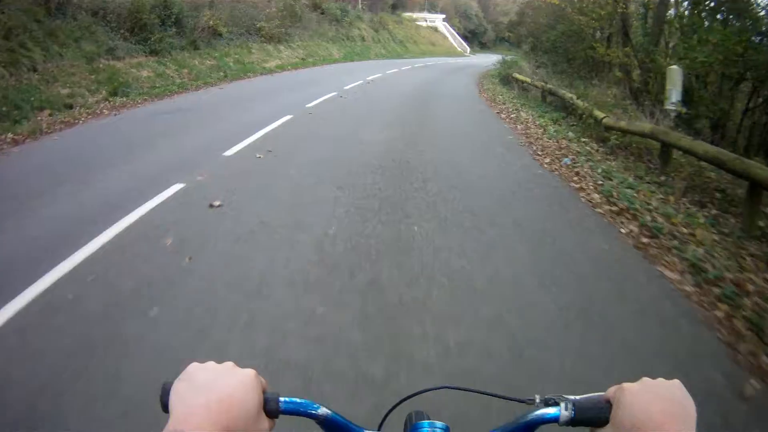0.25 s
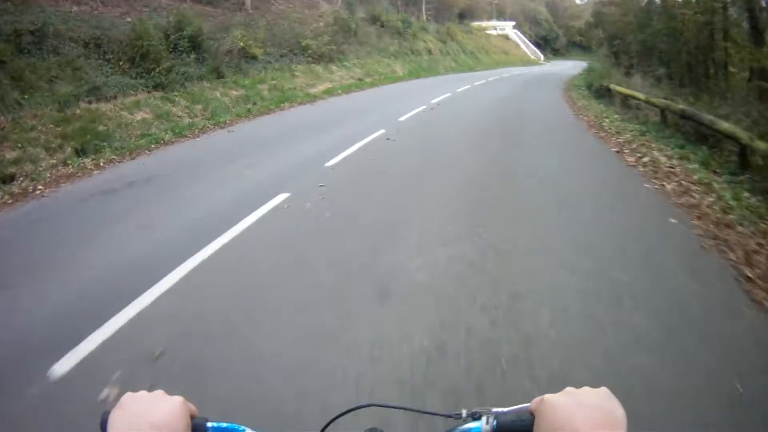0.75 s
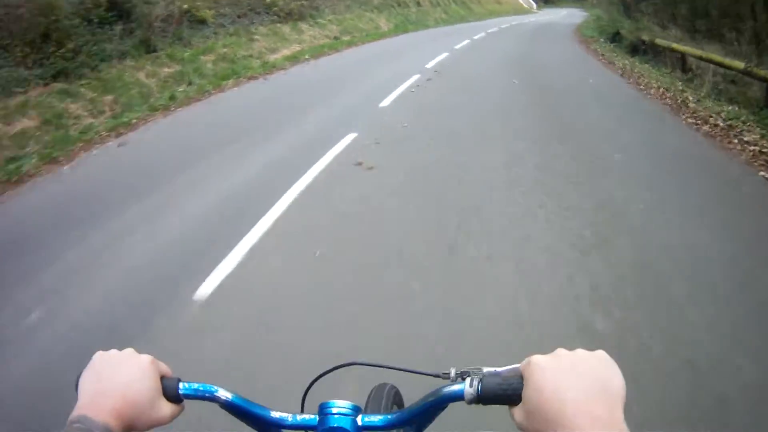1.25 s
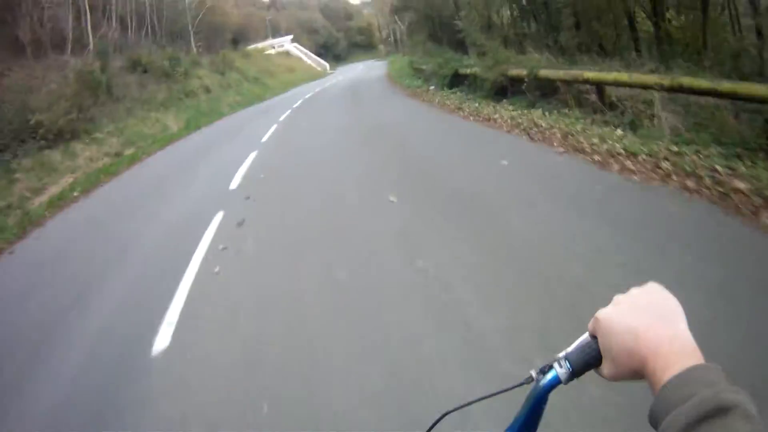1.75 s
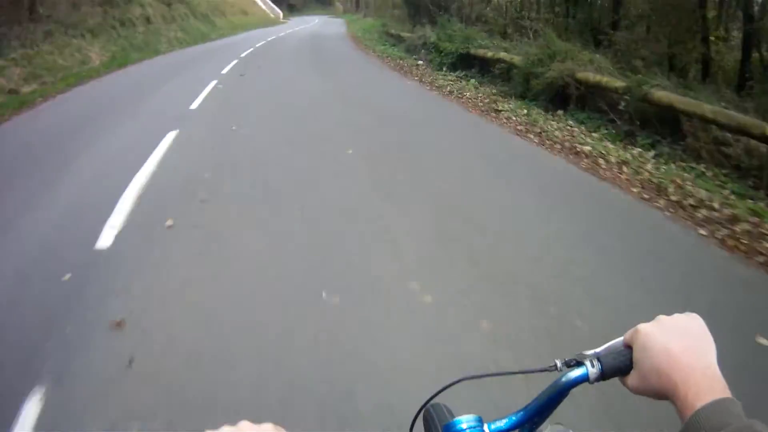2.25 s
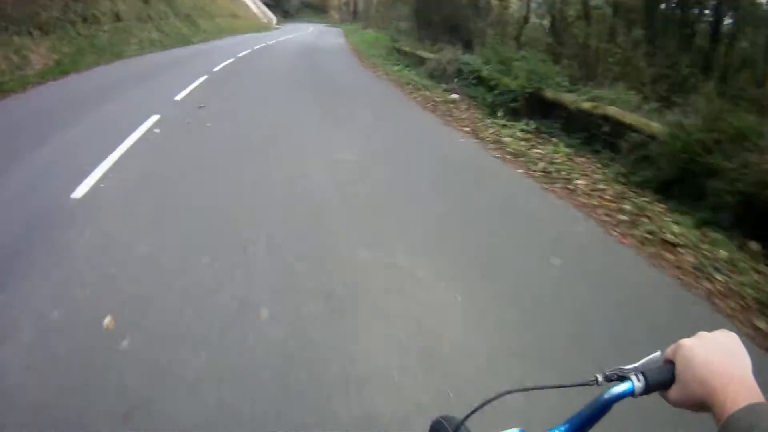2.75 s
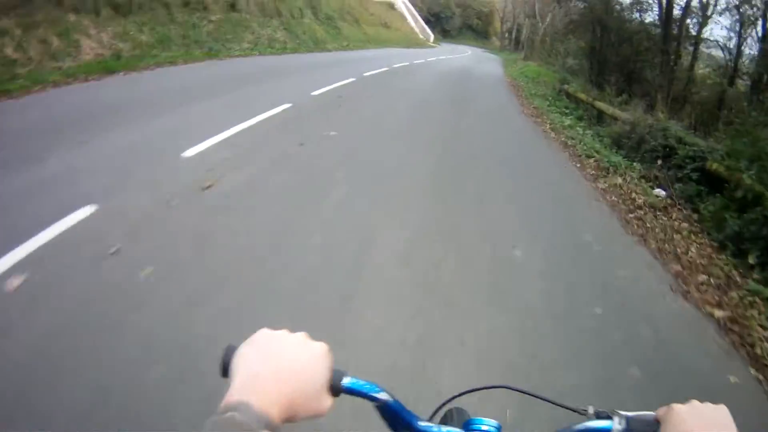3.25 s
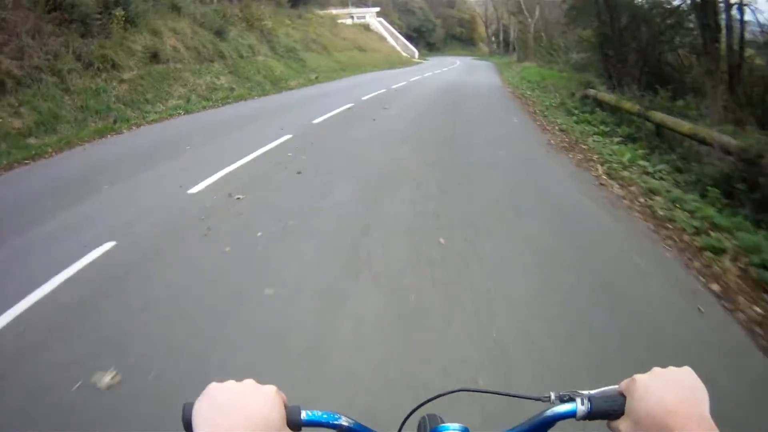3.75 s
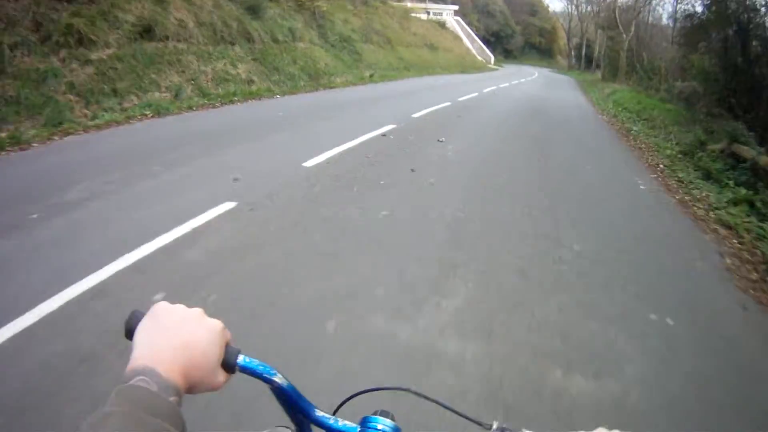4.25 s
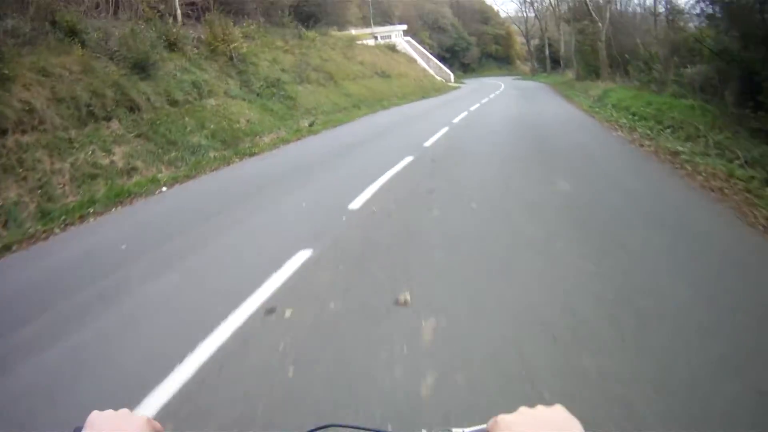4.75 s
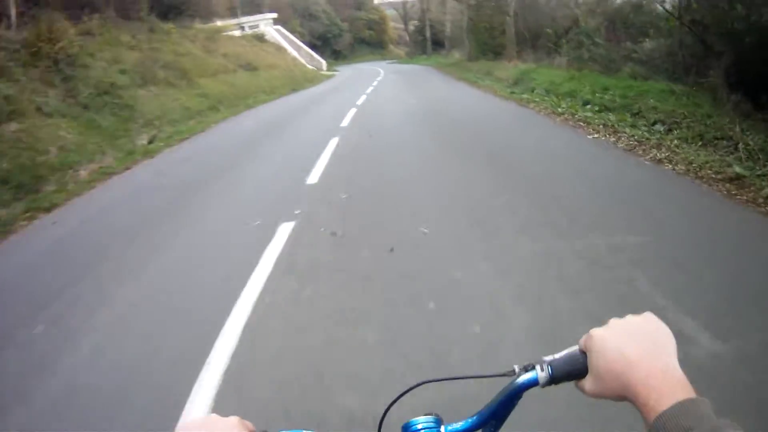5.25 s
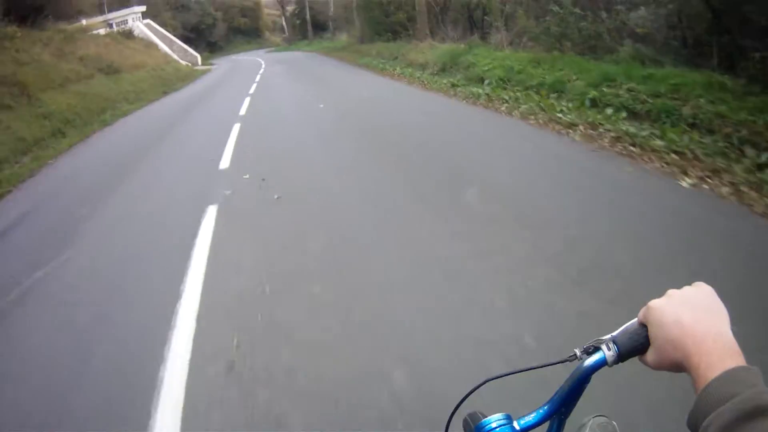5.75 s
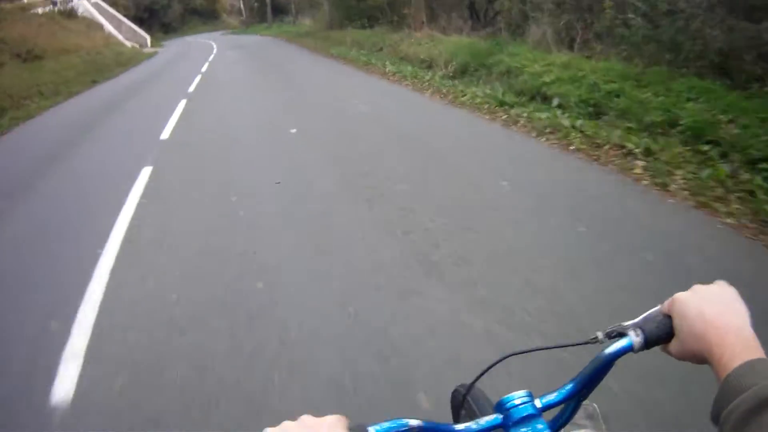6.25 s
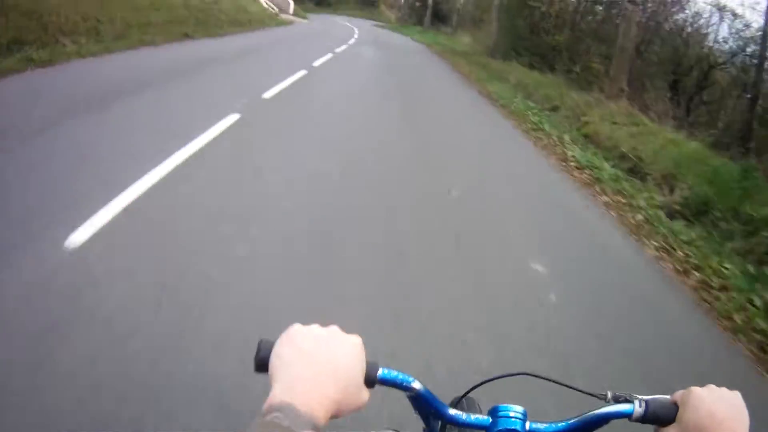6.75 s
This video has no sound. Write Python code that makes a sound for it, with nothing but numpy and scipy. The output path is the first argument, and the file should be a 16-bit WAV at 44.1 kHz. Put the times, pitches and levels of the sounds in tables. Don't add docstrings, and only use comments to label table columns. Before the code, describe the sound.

Continuous boxy rumbling hiss of wheels on coarse asphalt, with loose frame parts chattering, tiny metallic jingles, dull knocks and brief thin squeals.

```python
import sys
import numpy as np
from scipy import signal
from scipy.fft import rfft, irfft
from scipy.io import wavfile
from scipy.ndimage import uniform_filter1d, map_coordinates

SR = 44100
rng = np.random.default_rng(int(sys.argv[2]) if len(sys.argv) > 2 else 0)


def invert_db(level):
    return 10 ** (np.asarray(level, dtype=float) / 20)


def master_out(mix):
    frames = np.transpose(np.atleast_2d(mix))
    ceiling = np.clip(frames, -1, 1)
    pcm = np.round(ceiling * 32767).astype(np.int16)
    wavfile.write(sys.argv[1], SR, pcm)


N = 309141

# (time [s], load [dB])
ROAD_LOAD = [(0.0, -57.5), (0.15, -57), (0.8, -56.5), (1.31, -53.5), (1.68, -52), (2.24, -51.5),
             (2.93, -53), (3.28, -52.5), (3.61, -52), (3.86, -55.5), (4.0, -53), (4.31, -51), (4.84, -53.5),
             (5.09, -51), (5.41, -51.5), (6.19, -50.5), (6.33, -51), (7.01, -54.5)]
# (start [s], length [s], level [dB], pitch [Hz], roughness [0-1])
SLIDES = [(0.027, .07, -67.5, 2890, .6), (0.12, 0.12, -51, 2920, 0.56), (0.283, 0.1, -61, 2920, 0.8),
          (0.11, .13, -64, 3140, 0.6), (0.545, 0.11, -59, 3150, 0.7), (0.492, 0.089, -59, 2890, .5),
          (1.35, 0.16, -58, 2870, .6), (1.558, 0.047, -51, 2900, 0.3), (2.752, .025, -46.5, 2940, 0.5),
          (2.784, .05, -54, 2910, 0.4), (2.85, 0.079, -49.5, 2910, 0), (2.948, 0.027, -50, 2900, 0.3),
          (2.983, .05, -60, 3080, .7), (4.78, 0.13, -50, 2940, 0.44), (4.91, 0.14, -54.5, 2950, 1.1),
          (5.087, 0.07, -50, 2840, 0.3), (5.198, 0.04, -46.5, 2920, 0.2), (5.25, 0.1, -51.5, 2930, 0.5),
          (5.363, 0.081, -55.5, 2920, .9), (5.475, 0.14, -53.5, 2900, 0.74),
          (6.273, 0.047, -49.5, 2880, 0.6)]
# (pitch [Hz], width [Hz], level [dB])
CASE_MODES = [(1982, 160, -4.5), (2102, 190, 3.5), (2242, 206, 3), (3665, 490, -9.5), (1610, 1020, -19.5),
              (2865, 314, -4.5), (4550, 900, -10.5)]
# (pitch [Hz], width [Hz], level [dB])
HUB_MODES = [(937, 260, -3), (1147, 223, 2.5), (1254, 114, 4), (748, 480, -27)]
# (pitch [Hz], width [Hz], level [dB])
FRAME_MODES = [(4300, 110, -5), (4540, 260, -7), (4927, 215, -1.5), (5300, 430, -7), (5970, 140, -10.5),
               (6220, 160, -7.5), (6840, 1220, -11.5), (7290, 116, -8.5), (8490, 260, -14.5),
               (3550, 510, -6.5)]
# (pitch [Hz], width [Hz], level [dB])
JINGLE_MODES = [(9444, 160, -4), (9720, 410, -6.5), (11600, 140, -11), (14400, 750, -32), (15230, 230, -24)]
# (pitch [Hz], width [Hz], level [dB])
CHIME_MODES = [(10400, 170, -2), (10770, 500, -10), (11500, 590, -17), (11100, 100, -11), (12420, 520, -14),
               (12950, 710, -16.5), (14800, 900, -26), (15200, 420, -20.5)]

SLIDE_RISE_S, SLIDE_FALL_S = 0.02, 0.035
RING_RISE_S, RING_FALL_S = 0.037, 0.052


def unit(x):
    return x / np.sqrt(np.mean(x ** 2) + 1e-20)


def curves(rows):
    s, *cols = np.transpose(rows)
    return [np.interp(np.arange(N) / SR, s, c) for c in cols]


def wobble(rate):
    knots = rng.standard_normal(int(N * 400 / SR))
    return map_coordinates(knots, [np.arange(N) * rate / SR])


def coloured(x, gain):
    size = 2 ** 13
    cepstrum = irfft(np.log(gain(np.fft.rfftfreq(size, 1 / SR)) + 1e-6))
    cepstrum[1:size // 2] *= 2
    cepstrum[size // 2 + 1:] = 0
    response = irfft(np.exp(rfft(cepstrum)))
    return signal.fftconvolve(x, response)[:N]


def resonant(modes):
    def gain(f):
        power = sum(invert_db(2 * db) / (1 + (2 * (f - hz) / width) ** 2) ** 2 for hz, width, db in modes)
        return unit(np.sqrt(power))
    return gain


def sloped(points):
    hz, db = np.transpose(points)
    return lambda f: unit(invert_db(np.interp(np.log(f + 1), np.log(hz), db)))


def patchy(x, depth_db):
    z = signal.stft(x, nperseg=256)[2]
    field = uniform_filter1d(rng.standard_normal(z.shape), size=4, axis=0)
    field = uniform_filter1d(field, size=30, axis=1)
    return unit(signal.istft(z * invert_db(depth_db * unit(field)), nperseg=256)[1][:N])


def grit(spread_db, clump_db, clump_rate, patchy_db):
    sizes = invert_db(spread_db * wobble(300) + clump_db * wobble(clump_rate))
    return patchy(sizes * rng.standard_normal(N), patchy_db)


def swarms(times, peaks_db, rise, t60, first):
    starts = np.zeros(N)
    starts[np.round(times * SR).astype(int)] = invert_db(peaks_db)
    t = np.arange(SR // 10) / SR
    swarm = (1 - np.exp(-t / rise)) * invert_db(-60 * (t / t60) ** 1.15)
    envelope = np.abs(signal.fftconvolve(starts, swarm)[:N])
    return envelope * rng.standard_normal(N) + first * starts


def rings(times, peaks_db, pitches_hz, rise, t60):
    out, t = np.zeros(N + SR), np.arange(SR // 12) / SR
    for s, db, hz in zip(times, peaks_db, pitches_hz):
        drift = np.cumsum(0.088 * rng.standard_normal(len(t)))
        shape = (1 - np.exp(-t / rise)) * invert_db(db - 60 * t / t60)
        out[round(s * SR):][:len(t)] += shape * np.sin(2 * np.pi * hz * t + drift)
    return out[:N]


def trapezoid(t, start, length, rise, fall):
    return np.clip(np.minimum((t - start) / rise + .5, (start + length - t) / fall + .5), 0, 1)


def spells(starts, lengths, levels_db, rise, fall):
    t = np.arange(0, N + 32, 32) / SR
    power = sum(invert_db(2 * db) * trapezoid(t, s, length, rise, fall) ** 2
                for s, length, db in zip(starts, lengths, levels_db))
    return np.interp(np.arange(N) / SR, t, np.sqrt(power))


def driven(level_db, share, extra=0):
    mean_load_db = -52
    load_db, = curves(ROAD_LOAD)
    steady_db = level_db + share * (load_db - mean_load_db)
    return np.sqrt(invert_db(2 * steady_db) + extra ** 2)


def lifts():
    # (middle [s], length [s], depth [dB])
    dips = [(0.17, 0.029, 15), (0.486, 0.017, 11), (1.43, 0.026, 6), (2.89, 0.18, 2.5), (3.073, 0.037, 6),
            (3.19, 0.027, 8), (3.376, 0.036, 6), (3.99, 0.066, 6), (4.29, 0.047, 3), (4.49, 0.023, 8),
            (4.598, 0.027, 10), (5.273, 0.091, 4.5), (6.42, 0.075, 3), (6.632, 0.036, 5.5), (6.8, 0.02, 7),
            (6.883, 0.053, 2)]
    t = np.arange(0, N + 32, 32) / SR
    lost_db = sum(db * np.exp(-(2 * (t - s) / length) ** 2) for s, length, db in dips)
    return -np.interp(np.arange(N) / SR, t, lost_db)


def wheels():
    # (pitch [Hz], width [Hz], level [dB])
    axle_modes = [(1469, 164, 1), (1630, 93, -6.5)]
    # (pitch [Hz], width [Hz], level [dB])
    seat_modes = [(204, 97, 1), (274.4, 77, -1), (435, 120, -3), (616, 285, -3.5)]
    # (start [s], length [s], level [dB])
    axle_rings = [
        (0.28, 0.17, -71),
        (1.76, 0.43, -58.5),
        (4.65, 0.55, -59.5),
        (5.75, 0.41, -64),
        (1.14, 0.51, -69),
    ]
    shake = wobble(25)
    roll_db = curves(ROAD_LOAD)[0] + lifts()
    ringing = spells(*np.transpose(axle_rings), RING_RISE_S, RING_FALL_S)
    case = invert_db(roll_db + 2.0 + 0.35 * shake)
    case = case * grit(spread_db=1.5, clump_db=2.0, clump_rate=75, patchy_db=0.5)
    hub = driven(-59.5, 0.67) * invert_db(0.79 * shake)
    hub = hub * grit(spread_db=2.0, clump_db=0.54, clump_rate=40, patchy_db=0.5)
    axle = driven(-60.5, 0.7, ringing) * invert_db(0.65 * shake)
    axle = axle * grit(spread_db=1.5, clump_db=-0.24, clump_rate=55, patchy_db=0.5)
    seat = driven(-68.5, 0.28) * invert_db(0.21 * shake)
    seat = seat * grit(spread_db=2.5, clump_db=-0.5, clump_rate=18, patchy_db=1.0)
    shell = coloured(case, resonant(CASE_MODES)) + coloured(hub, resonant(HUB_MODES))
    return shell + coloured(axle, resonant(axle_modes)) + coloured(seat, resonant(seat_modes))


def chatter():
    # (start [s], length [s], chatter level [dB], jingle level [dB], chime level [dB])
    coarse_road = [(0.0, 0.095, -61, -61.5, -62), (0.176, 0.017, -51, -58, -56), (0.91, 0.3, -64, -72, -74),
                   (1.165, 0.035, -62, -63, -67), (1.274, 0.085, -58, -59, -57.5),
                   (1.418, 0.23, -55, -60.5, -55.5), (1.664, 0.33, -57.5, -66, -61.5),
                   (2.048, 0.16, -56, -60, -61), (2.22, 0.41, -57.5, -60.5, -57.5),
                   (2.61, 0.13, -57, -60, -58), (2.732, 0.11, -58.5, -66, -56.5),
                   (2.892, 0.15, -57.5, -59, -59), (3.093, 0.078, -56.5, -66, -71),
                   (3.212, 0.15, -57.5, -63, -70), (3.534, 0.11, -58, -58, -56),
                   (3.656, 0.08, -57.5, -56, -57), (3.885, 0.1, -65, -75, -72),
                   (4.018, 0.11, -58.5, -68, -64), (4.133, 0.1, -60, -63, -61),
                   (4.212, 0.041, -49.5, -53, -55), (4.344, 0.17, -66, -80, -75),
                   (4.485, 0.11, -57, -60, -58), (4.642, 0.21, -63.5, -71, -67),
                   (5.043, 0.23, -58, -58, -59), (5.283, 0.31, -55.5, -59.5, -56.5),
                   (5.625, 0.3, -59, -62, -58.5), (5.835, 0.18, -55.5, -63, -58),
                   (6.044, 0.2, -53.5, -56, -57), (6.254, 0.28, -58.5, -61, -61),
                   (6.45, 0.12, -51, -55.5, -52), (6.584, 0.05, -51.5, -60, -60),
                   (6.682, 0.053, -56, -63, -62)]
    start, length, *levels_db = np.transpose(coarse_road)
    clatter_spell, jingle_spell, chime_spell = [spells(start, length, db, rise=0.044, fall=0.019)
                                                for db in levels_db]
    pause = invert_db(0.27 * lifts())
    jolt = wobble(30)
    clatter = pause * driven(-62, 1, clatter_spell) * invert_db(1.2 * jolt)
    clatter = clatter * grit(spread_db=2.5, clump_db=1.5, clump_rate=87, patchy_db=0.66)
    jingle = pause * driven(-70, 0.72, jingle_spell) * invert_db(-6.0 + 1.6 * jolt)
    jingle = jingle * grit(spread_db=3.0, clump_db=2.0, clump_rate=70, patchy_db=2.0)
    chime = pause * driven(-70, 0.72, chime_spell) * invert_db(-8.0 + 1.5 * jolt)
    chime = chime * grit(spread_db=3.5, clump_db=2.5, clump_rate=85, patchy_db=0.5)
    high = coloured(jingle, resonant(JINGLE_MODES)) + coloured(chime, resonant(CHIME_MODES))
    return coloured(clatter, resonant(FRAME_MODES)) + high


def wind():
    # (start [s], length [s], level [dB])
    gust_spells = [
        (0.144, 0.14, -74),
        (2.05, 0.19, -81),
        (2.5, 0.17, -73),
        (4.63, 0.14, -70),
        (4.982, 0.13, -69),
    ]
    # (frequency [Hz], level [dB per Hz])
    pressure_slope = [(10, -20), (25, 5.5), (45, -12.5), (75, -15.5), (130, -14.5), (300, -29), (1000, -69)]
    steady = invert_db(-77.5 + 1.5 * wobble(4))
    press = np.hypot(steady, spells(*np.transpose(gust_spells), RING_RISE_S, RING_FALL_S))
    lumps = coloured(rng.standard_normal(N), sloped(pressure_slope))
    return press * invert_db(3.5 + 0.86 * wobble(11.0)) * lumps


def case_taps():
    # (time [s], peak [dB], hollow part [dB])
    tap_events = [(0.027, -30, -13), (0.365, -31, -18), (0.462, -31, -21), (0.525, -32, -18),
                  (0.51, -34, -16), (0.555, -34, -15), (0.657, -31.5, -15), (0.1867, -31, -10),
                  (0.925, -36, -3.5), (1.051, -28, -28), (1.3867, -49, -17), (2.3191, -40, -24),
                  (2.4742, -30, -14), (2.76, -29, -21), (3.022, -32, -11), (3.5498, -29, -15),
                  (4.0392, -30, -17), (4.3405, -33, -17), (4.423, -32, -17), (4.461, -29, -19),
                  (4.7208, -29, -13), (4.9262, -29, -17), (5.1332, -30, -14), (5.196, -27, -18),
                  (5.2315, -29, -13), (5.6464, -48, -15), (5.7506, -39, -15), (6.0135, -40, -17),
                  (6.3235, -38, -23), (6.647, -40, -25), (6.6628, -34, -28), (6.8214, -34, -23),
                  (2.248, -27, -21), (2.358, -27, -13), (2.5147, -25, -16), (2.5905, -24, -19),
                  (2.6384, -24.5, -18), (3.096, -32, -19), (3.1303, -25, -16), (3.182, -28.5, -23),
                  (3.2173, -27, -21), (3.241, -43, -17), (3.3015, -26, -11), (3.3373, -26.5, -16),
                  (3.634, -26, -23), (3.7564, -32, -26), (4.097, -36.5, 0), (4.1794, -23.5, -28),
                  (4.2353, -27, -16), (4.299, -31, -21), (4.4992, -25, -17), (4.524, -26, -12),
                  (4.6187, -34, -10), (5.771, -36, -24), (5.8172, -33, -28), (5.89, -33, -13),
                  (6.0573, -29, -14), (6.485, -38.5, -2), (6.7517, -24, -34), (6.8533, -24.5, -32)]
    s, db, hollow_db = np.transpose(tap_events)
    contact = swarms(s, db - 17.0, rise=0.001, t60=0.016, first=9.7)
    ring = rings(s, db - 8.0, np.full(len(s), 2150), rise=0.0012, t60=0.014)
    hollow = swarms(s, db + hollow_db - 6.0, rise=0.0029, t60=0.033, first=5.2)
    return coloured(contact, resonant(CASE_MODES)) + coloured(hollow, resonant(HUB_MODES)) + ring


def sleeves():
    # (pitch [Hz], width [Hz], level [dB])
    sleeve_modes = [(2930, 360, -5.5), (2840, 140, -9), (3210, 270, -5.5)]
    # (pitch [Hz], width [Hz], level [dB])
    rim_modes = [(3337, 196, 5), (3350, 210, -6), (3280, 150, -7)]
    # (start [s], length [s], level [dB])
    rim_rings = [
        (1.742, 0.41, -62.5),
        (2.245, 0.52, -76),
        (3.54, 0.27, -63),
        (3.853, 0.45, -60),
        (4.35, 0.15, -56),
        (4.93, 0.17, -59),
        (5.516, 0.066, -52),
        (6.15, 0.083, -53),
        (6.48, 0.053, -46),
        (6.563, 0.076, -55),
    ]
    s, length, db, *_ = np.transpose(SLIDES)
    sliding = spells(s, length, db - 8.5, SLIDE_RISE_S, SLIDE_FALL_S)
    ringing = spells(*np.transpose(rim_rings), RING_RISE_S, RING_FALL_S)
    scrape = grit(spread_db=3.0, clump_db=1.4, clump_rate=25, patchy_db=-0.2)
    scrape = driven(-64, 0.16, sliding) * coloured(scrape, resonant(sleeve_modes))
    rim = grit(spread_db=2.0, clump_db=2.0, clump_rate=45, patchy_db=2.6)
    rim = driven(-62, 0.63, ringing) * coloured(rim, resonant(rim_modes))
    return scrape + rim


def squeals():
    out, t = np.zeros(N), np.arange(N) / SR
    wander = np.cumsum(14.5 * wobble(25)) / SR
    even, edge = wobble(200), wobble(200)
    for s, length, db, hz, rough in SLIDES:
        on = slice(max(0, int((s - .1) * SR)), int((s + length + .1) * SR))
        phase = 2 * np.pi * (hz * t[on] + wander[on])
        rough = np.clip(rough, 0, 1)
        steady = np.sqrt(1 - rough ** 2)
        line = (steady + rough * even[on]) * np.cos(phase) + rough * edge[on] * np.sin(phase)
        out[on] += invert_db(db) * trapezoid(t[on], s, length, SLIDE_RISE_S, SLIDE_FALL_S) * line
    return out


def ticks():
    # (time [s], peak [dB], ringing pitch [Hz])
    tick_events = [(0.0667, -56, 9620), (0.0852, -41, 9370), (1.0216, -41, 9650), (1.095, -58, 11500),
                   (2.0812, -44, 10400), (2.3331, -41, 10400), (2.385, -38, 10400), (2.4887, -39, 10400),
                   (2.6334, -43, 9710), (3.0934, -48, 9740), (3.2146, -53, 9600), (3.4845, -47, 9400),
                   (3.5892, -41, 9400), (3.717, -39, 9500), (4.014, -54, 14000), (4.082, -43, 11500),
                   (4.7691, -44, 10500), (5.1108, -54, 9500), (5.1427, -38, 9400), (5.3158, -45, 9630),
                   (5.9234, -44, 9900), (6.2497, -49, 9530), (0.2533, -41.5, 9800), (0.3935, -50, 9440),
                   (0.9228, -41, 9350), (0.9967, -41, 9500), (1.069, -43, 9460), (1.49, -36, 9540),
                   (2.031, -42, 9460), (2.5915, -41, 9900), (3.1577, -41, 9400), (4.0432, -47, 9940),
                   (4.0652, -46, 9440), (4.1337, -38.5, 9720), (4.2018, -44, 9300), (4.4912, -44, 9540),
                   (4.5246, -37, 9430), (4.5535, -38, 9400), (4.606, -38, 9550), (4.6623, -39, 9700),
                   (4.736, -36, 9400), (4.8093, -41, 9520), (5.0504, -48, 9500), (5.2287, -35.5, 9650),
                   (6.0541, -41, 9750), (6.1685, -36, 10200), (6.208, -34, 10400), (6.5156, -40, 10400),
                   (6.5879, -51, 9350), (6.722, -43, 9810), (6.88, -44, 9400)]
    s, db, hz = np.transpose(tick_events)
    jingle = swarms(s, db - 16.5, rise=0.0024, t60=0.036, first=5.9)
    chime = swarms(s, db - 17.0, rise=0.0026, t60=0.031, first=4.3)
    ring = rings(s, db - 9.0, hz, rise=.001, t60=0.034)
    return coloured(jingle, resonant(JINGLE_MODES)) + coloured(chime, resonant(CHIME_MODES)) + ring


def knocks():
    # (time [s], peak [dB], case part [dB])
    bracket_knocks = [(0.1765, -40, 3), (1.724, -36.5, -10), (1.914, -40.5, 8), (2.2677, -44, -10),
                      (2.3775, -37, 10), (2.6366, -34, -8), (2.951, -32.5, -15), (2.9954, -32, -10),
                      (3.0945, -41, -4), (3.24, -27, 1.5), (3.7165, -34.5, 0), (4.0642, -37, -6),
                      (4.1767, -36.5, 7), (4.8828, -37.5, -11), (5.431, -34.5, -1), (5.767, -35, -4),
                      (5.8306, -36, 4), (5.8805, -37, 3), (6.0536, -36, 5), (6.1642, -31, -18),
                      (6.2886, -33.5, 0), (6.496, -27.5, -3), (6.5914, -43, -7), (6.6786, -38, -1),
                      (6.852, -41, 11)]
    # (time [s], peak [dB], case part [dB], ringing pitch [Hz])
    frame_knocks = [(0.072, -45, 4, 4940), (0.426, -41, 7, 3370), (0.785, -45, -5, 4500),
                    (0.9943, -37.5, 7, 6380), (1.3676, -35.5, -13, 4560), (1.395, -39, 12, 4300),
                    (1.4411, -36, 3.5, 5200), (2.2483, -31.5, -17, 4500), (2.3351, -42, 10, 4290),
                    (3.1812, -45, 3, 4550), (3.219, -39, 1, 6030), (3.469, -43, -9, 4800),
                    (3.8823, -35.5, -13, 5350), (4.0998, -35, 2, 6290), (4.2326, -38, -4, 4400),
                    (4.4972, -40.5, 12, 6840), (4.5234, -30.5, 4.5, 5300), (4.9626, -46, 14, 4800),
                    (5.1314, -38, 3, 5200), (5.24, -40, -4, 4300), (5.329, -40, -15, 4180),
                    (6.21, -35.5, -13, 4540)]
    bracket_hz = 4990
    s, db, case_db, hz = np.transpose([(*row, bracket_hz) for row in bracket_knocks] + list(frame_knocks))
    case = swarms(s, db + case_db - 5.0, rise=0.0089, t60=0.047, first=1.5)
    frame = swarms(s, db - 12.5, rise=0.0017, t60=0.037, first=1.7)
    ring = rings(s, db - 6.0, hz, rise=0.0011, t60=0.046)
    jingle = swarms(s, db - 32, rise=0.0029, t60=0.023, first=3.3)
    chime = swarms(s, db - 24.5, rise=0.0024, t60=0.026, first=3.0)
    low = coloured(case, resonant(CASE_MODES)) + coloured(frame, resonant(FRAME_MODES))
    high = coloured(jingle, resonant(JINGLE_MODES)) + coloured(chime, resonant(CHIME_MODES))
    return low + high + ring


def bumps():
    # (time [s], peak [dB], pitch [Hz])
    road_bumps = [(0.158, -46, 196), (1.26, -70, 194), (1.325, -53, 267), (1.983, -50, 222),
                  (2.228, -53, 196.6), (2.821, -42, 187), (3.346, -51.5, 194), (4.448, -53, 210),
                  (5.03, -52, 163), (5.525, -48, 190), (6.151, -53, 180), (6.306, -49, 217)]
    # (time [s], peak [dB], pitch [Hz])
    more_bumps = [(0.17, -55, 100), (1.728, -69, 100), (1.98, -52.5, 120), (2.136, -52, 212),
                  (2.45, -60, 210), (2.863, -52, 180), (3.638, -55, 95), (5.035, -62, 100),
                  (5.53, -55, 100), (2.816, -56, 100), (5.735, -67, 95), (5.845, -66, 95),
                  (6.49, -52, 450), (6.534, -50, 430), (4.37, -64, 70)]
    out, t = np.zeros(N + SR), np.arange(SR // 5) / SR
    for s, db, hz in list(road_bumps) + list(more_bumps):
        shape = (1 - np.exp(-t / 0.0042)) * invert_db(db + 1.0 - 60 * t / 0.053)
        cycles = np.sin(2 * np.pi * hz * t) + 0.3 * np.sin(2 * np.pi * 0.54 * hz * t)
        out[round(s * SR):][:len(t)] -= shape * cycles
    return out[:N]


def pings():
    # (time [s], peak [dB], ringing pitch [Hz])
    ping_events = [(0.185, -50, 6900), (0.2518, -49, 6230), (0.9223, -47, 6260), (1.022, -49, 6250),
                   (1.068, -44, 6230), (1.4476, -39.5, 6200), (1.6886, -45, 6170), (2.2653, -41, 6950),
                   (2.4513, -43, 7040), (2.4917, -44, 7320), (2.6259, -45, 6910), (2.9806, -48, 7100),
                   (3.094, -37.5, 7230), (3.1298, -42, 6100), (3.244, -36, 7200), (3.793, -63, 6300),
                   (3.881, -46, 6840), (4.0138, -48, 6260), (4.0636, -40, 6600), (4.133, -43, 6100),
                   (4.1769, -38.5, 7330), (4.2048, -42, 6270), (4.227, -42, 6230), (4.5228, -37, 6820),
                   (4.6064, -44, 6270), (4.6598, -51, 6260), (5.1188, -50, 6340), (5.133, -38, 6200),
                   (5.5174, -44, 6190), (5.7044, -44, 7290), (5.8985, -47, 7340), (6.0122, -42, 7400),
                   (6.0561, -43, 6240), (6.096, -47, 6220), (6.1639, -35.5, 7200), (6.2487, -51, 6260),
                   (6.4517, -49, 5900), (6.493, -37, 7290), (6.5874, -55, 6020), (6.6762, -53, 6100),
                   (6.7271, -41, 6030)]
    s, db, hz = np.transpose(ping_events)
    clatter = swarms(s, db - 11.0, rise=0.0015, t60=0.03, first=2.7)
    ring = rings(s, db - 4.0, hz, rise=0.0015, t60=0.04)
    return coloured(clatter, resonant(FRAME_MODES)) + ring


def thumps():
    # (time [s], peak [dB])
    thump_events = [(0.924, -42), (1.025, -46), (1.067, -44.5), (1.498, -42.5), (1.54, -42), (4.041, -41),
                    (4.206, -41), (4.228, -39.5), (4.248, -43), (4.554, -42.5), (4.578, -37.5), (5.14, -46),
                    (6.146, -42), (6.373, -42.5), (6.5, -42)]
    # (pitch [Hz], width [Hz], level [dB])
    shell_modes = [(993, 102, 6.5), (515, 210, -6.5), (764, 790, -11)]
    s, db = np.transpose(thump_events)
    return coloured(swarms(s, db - 11.0, rise=0.0028, t60=0.038, first=16.0), resonant(shell_modes))


def snaps():
    # (time [s], peak [dB])
    snap_events = [
        (2.2872, -53),
        (2.6529, -53),
        (2.9816, -50),
        (4.578, -55),
        (5.1243, -51),
        (6.7216, -56),
    ]
    s, db = np.transpose(snap_events)
    cracks = swarms(s, db, rise=0.001, t60=0.025, first=1.5)
    return coloured(cracks, lambda f: f / np.hypot(f, 7000))


def scene():
    mono = wheels() + chatter() + wind() + case_taps() + sleeves() + squeals()
    mono = mono + ticks() + knocks() + bumps() + pings() + thumps() + snaps()
    return np.array([mono, mono])


def low_pass(x):
    return signal.sosfilt(signal.butter(12, 15540, fs=SR, output="sos"), x)


def record(dry):
    # (frequency [Hz], level [dB per Hz])
    hiss_slope = [(20, -16), (300, -5), (4000, 7), (9000, -9.5), (15500, -8)]
    hiss = invert_db(-63.5) * patchy(coloured(rng.standard_normal(N), sloped(hiss_slope)), depth_db=2.5)
    # (frequency [Hz], level [dB per Hz])
    trace_slope = [(60, -43), (200, -33), (500, -14.5), (900, -16.5), (3000, -17.0), (8000, -9.5), (15000, -5.5)]
    apart = invert_db(-78.0 + 2.1 * wobble(14)) * coloured(rng.standard_normal(N), sloped(trace_slope))
    in_band = np.fft.rfftfreq(N, 1 / SR) < 15320
    spectrum = rfft(dry + hiss + [apart, -apart]) * in_band
    return low_pass(irfft(spectrum, N))


dry = scene()
out = record(dry)
master_out(out)
```